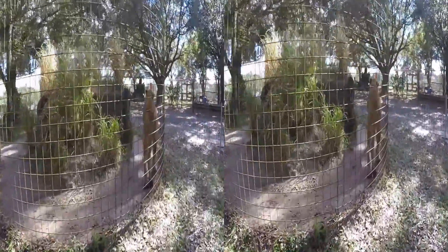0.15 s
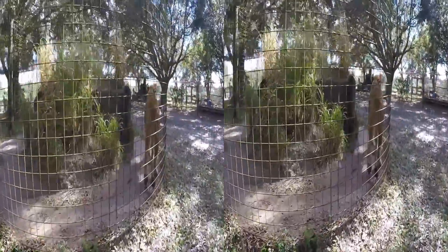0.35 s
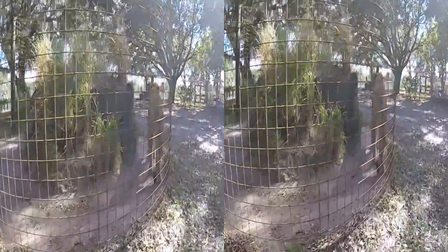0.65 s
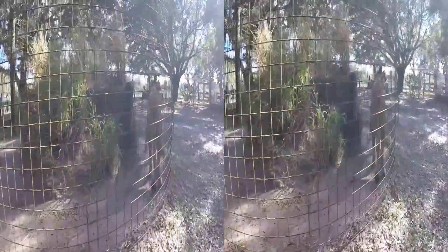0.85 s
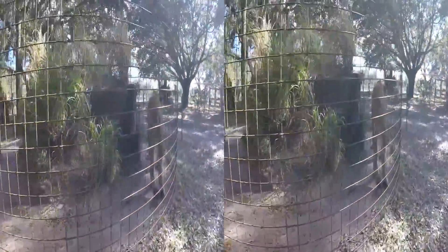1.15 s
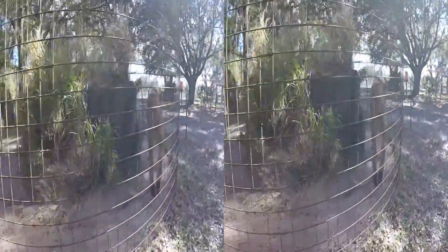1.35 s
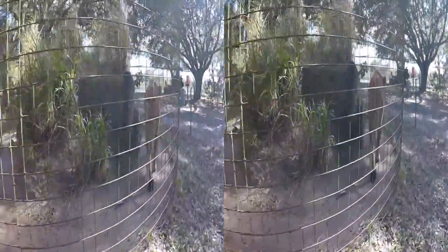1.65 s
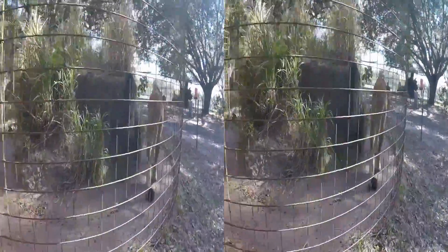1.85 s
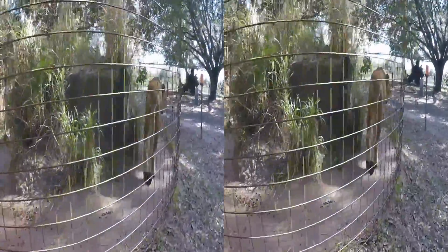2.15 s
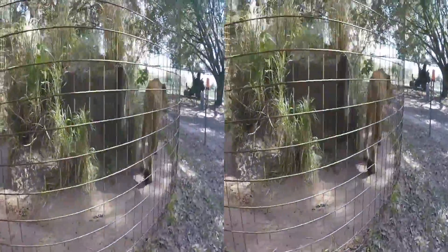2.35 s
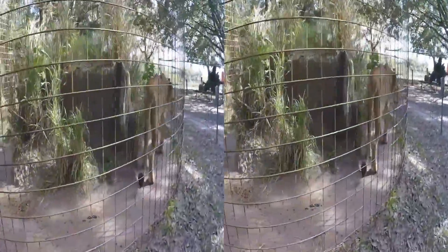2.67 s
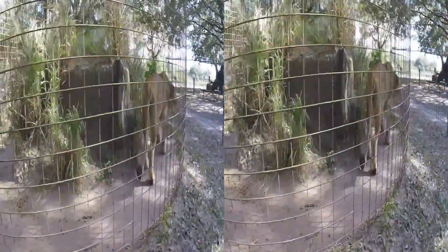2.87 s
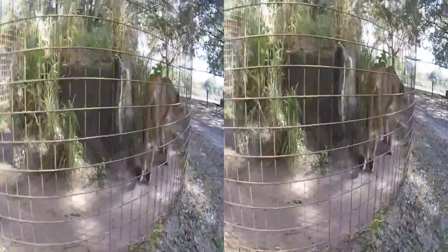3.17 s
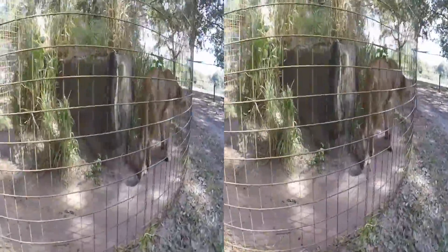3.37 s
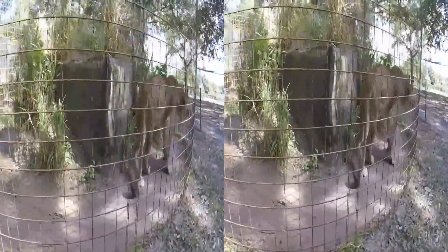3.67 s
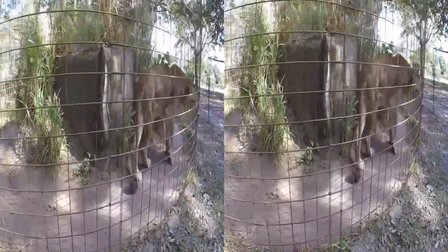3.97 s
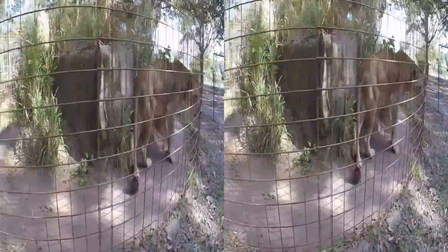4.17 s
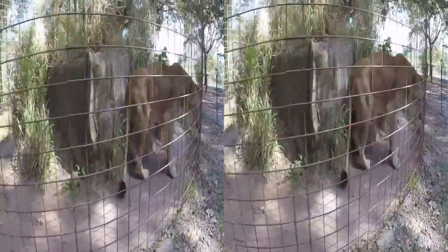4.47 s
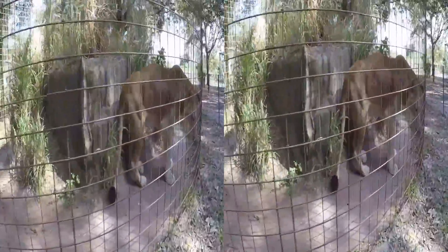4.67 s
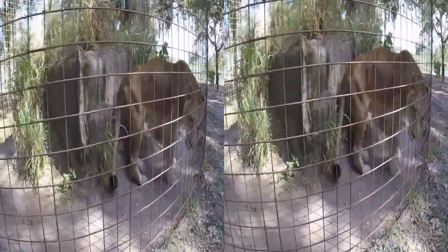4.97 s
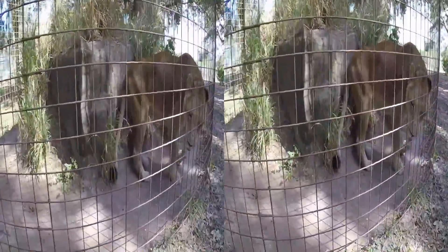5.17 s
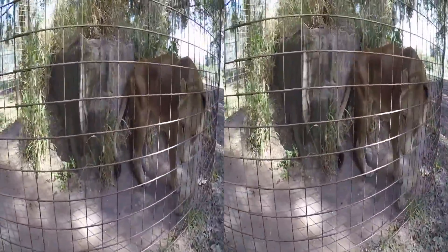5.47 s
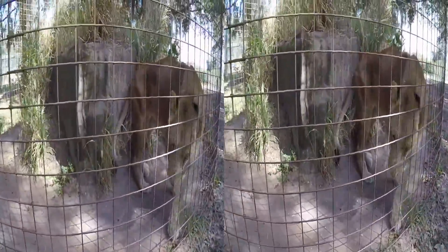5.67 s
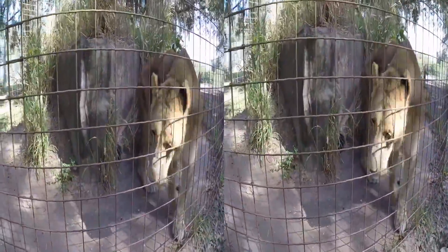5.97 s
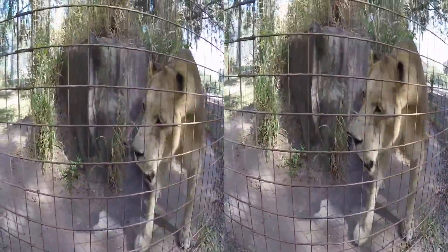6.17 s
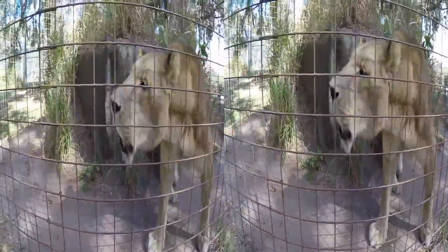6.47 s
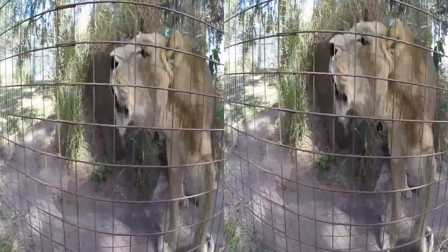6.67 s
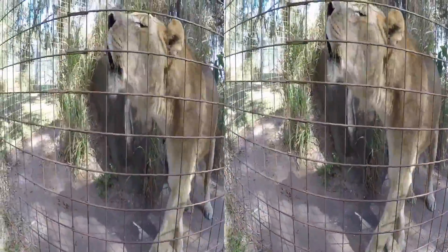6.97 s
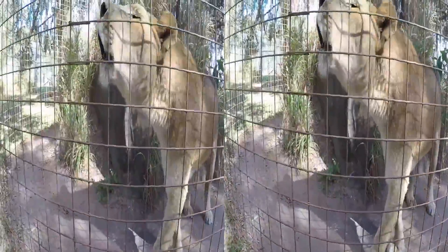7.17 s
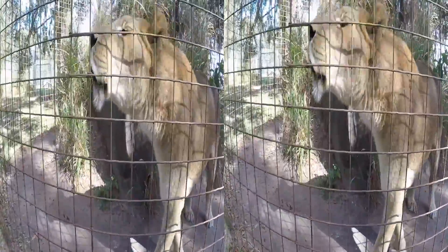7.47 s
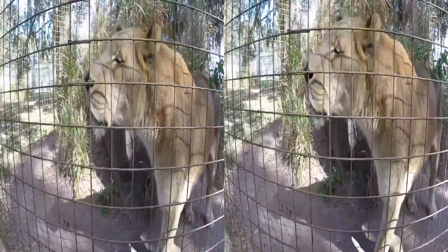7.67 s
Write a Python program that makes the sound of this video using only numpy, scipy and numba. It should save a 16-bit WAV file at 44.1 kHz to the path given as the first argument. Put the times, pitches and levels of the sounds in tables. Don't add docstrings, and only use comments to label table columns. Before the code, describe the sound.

A lion comes nearer along a fenced woodland enclosure. First a low far moan under wind buffeting, then crackling litter and small twig snaps, then a hoarse mid-distance roar with fluttering grit. The wind eases, steps rustle, and the last roar is overwhelmingly loud and close to the single microphone, rasping down into a slack growl. The background briefly drops, then creeps back with faint bird chips and a weak echo from trees.

```python
import sys
import numpy as np
from scipy import signal
from scipy.fft import rfft, irfft, next_fast_len
from scipy.io import wavfile
from scipy.ndimage import uniform_filter1d, map_coordinates
from numba import njit

SR = 44100
rng = np.random.default_rng(int(sys.argv[2]) if len(sys.argv) > 2 else 0)


def inscribe(sig):
    pcm = np.round(np.clip(np.atleast_2d(sig).T, -1, 1) * 32767)
    wavfile.write(sys.argv[1], SR, pcm.astype(np.int16))


def ratio(d):
    e = np.asarray(d, float) / 20
    return 10 ** e


N = 345300
TIME = np.arange(N) / SR


def unit(x):
    return x / np.sqrt(np.mean(x ** 2) + 1e-20)


def even(x, span_s=0.097):
    return x / np.sqrt(np.abs(uniform_filter1d(x ** 2, int(span_s * SR))) + 1e-20)


def curves(rows):
    s, *columns = np.transpose(rows)
    return [np.interp(TIME, s, column) for column in columns]


def phrases(tables, fade_s=0.012):
    gate = 0
    for table in tables:
        start, end = table[0][0], table[-1][0]
        gate = gate + np.clip(np.minimum(TIME - start + fade_s, end - TIME) / fade_s, 0, 1)
    return [np.minimum(gate, 1)] + curves(np.concatenate(tables))


def wobble(rate):
    return map_coordinates(rng.standard_normal(int(N * rate / SR) + 4), [TIME * rate])


def filtered(x, response):
    m = next_fast_len(N + 8192)
    return irfft(rfft(x, m) * response(np.fft.rfftfreq(m, 1 / SR)), m)[:N]


def noise(points):
    hz, db = np.transpose(points)
    response = lambda f: ratio(np.interp(np.log(f + 1), np.log(hz + 1), db))
    return unit(filtered(rng.standard_normal(N), response))


def modes(table):
    def response(f):
        total = 0
        for k, (hz, width, db) in enumerate(table):
            damping = 1j * f * width
            total = total + (-1) ** k * ratio(db) * damping / (hz * hz - f * f + damping)
        return total
    return response


@njit
def resonate(x, turn, r):
    y = np.zeros(len(x))
    for i in range(2, len(x)):
        y[i] = (1 - r) * (x[i] - x[i - 2]) + 2 * r * turn[i] * y[i - 1] - r * r * y[i - 2]
    return y


def tract(x, hz, width, db):
    turn = np.cos(2 * np.pi * hz / SR)
    narrow = resonate(x, turn, np.exp(-np.pi * width / SR))
    return ratio(db) * resonate(narrow, turn, np.exp(-np.pi * 5 * width / SR))


def duck():
    since = TIME - 7.42
    drop_db, recover_db_per_s = -11, 11.5
    return ratio(np.where(since > 0, np.minimum(drop_db + recover_db_per_s * since, 0), 0))


# start_s, thud_db, flap_db, half_length_s
GUSTS = [(0.01, -21, -32, 0.1), (0.37, -25, -29, 0.09), (0.619, -20.5, -18.5, 0.058),
         (0.695, -44, -22.5, 0.019), (0.818, -24, -35.5, 0.04), (0.978, -15, -28, 0.033),
         (1.135, -62, -37, 0.075), (1.336, -23, -19.5, 0.035), (1.458, -20, -23, 0.062),
         (1.596, -18, -27, 0.051), (1.949, -16.5, -23, 0.036), (2.062, -39, -23, 0.035),
         (2.166, -29, -31, 0.049), (2.344, -16, -21, 0.031), (2.425, -19.5, -20.5, 0.029),
         (2.542, -11, -21, 0.044), (2.656, -22.5, -22.5, 0.05), (2.874, -15.5, -22, 0.033),
         (3.146, -25, -33, 0.056), (3.49, -22.5, -21.5, 0.08)]
# start_s, level_db
BREEZE = [(0, -24), (1.1, -26), (1.7, -30.5), (2.0, -33), (2.28, -32), (2.42, -26.5), (2.95, -26),
          (3.3, -24), (3.9, -29), (4.25, -36), (5.3, -37), (6.2, -37.5), (7.0, -36), (7.83, -35.5)]
# pitch_hz, level_db (per Hz)
BUFFET_SPECTRUM = [(7.1, -40.5), (12, 2), (65, 4), (130, -6.5), (170, -15), (290, -120)]
FLAP_SPECTRUM = [(47, -41.5), (80, -6.5), (144, -1.5), (183, -9), (296, -21), (414, -36), (700, -47.5),
                 (910, -61.5), (1540, -120)]


def wind():
    gust = lambda s, db, half: ratio(db) * np.exp(-((TIME - s) / half) ** 4)
    thuds = sum(gust(s, db, 1.095 * half) for s, db, _, half in GUSTS)
    flaps = sum(gust(s, db, half) for s, _, db, half in GUSTS)
    low = even(ratio(11.0 * wobble(14)) * noise(BUFFET_SPECTRUM), span_s=0.083)
    sharp = even(ratio(2.0 * wobble(34.95)) * noise(FLAP_SPECTRUM), span_s=0.044)
    return (ratio(curves(BREEZE)[0]) * duck() + thuds) * low + flaps * sharp


# pitch_hz, level_db (per Hz)
PARK_SPECTRUM = [(53, -31.5), (90, 2.5), (132, -5.5), (312, -19.5), (607, -22.5), (1020, -24.5),
                 (2150, -35.5), (2450, -36), (5290, -40), (14200, -52.5), (15100, -61)]


def park():
    level_db, swell_db = -42, .8
    return duck() * ratio(level_db + swell_db * wobble(2.71)) * noise(PARK_SPECTRUM)


# start_s, peak_db, pitch_hz
CHIPS = [
    (0.049, -60, 7160),
    (0.8365, -54, 6750),
    (5.8596, -45, 6720),
    (7.649, -54, 6800),
]
# start_s, end_s, pitch_hz, level_db
FAR_BIRD = [
    (2.145, 2.165, 2870, -62),
    (2.285, 2.385, 2900, -64),
]


def bird():
    out, t = np.zeros(N + 9000), TIME[:9000]
    for s, db, hz in CHIPS:
        note = np.sin(2 * np.pi * hz * t) * np.exp(-((t - .006) / 0.0035) ** 2)
        echo = rng.standard_normal(9000) * ratio(-30.0 - 60 * t / 0.32)
        out[round(s * SR):][:9000] += ratio(db) * (note + signal.fftconvolve(note[:900], echo)[:9000])
    far = 0
    for start, end, hz, db in FAR_BIRD:
        swell = np.sqrt(np.abs(np.sin(np.pi * np.clip((TIME - start) / (end - start), 0, 1))))
        tone = np.sin(2 * np.pi * hz * TIME + .5 * wobble(40))
        far = far + ratio(db) * tone * swell * (TIME < end)
    return out[:N] + far


# start_s, effort_db, mouth_opening (0-1), airflow_db
FAR_CALL = [
    [(0, -22.5, 0.4, -59), (.09, -23, 0.34, -68), (.13, -15.5, 0.35, -61), (.246, -13, 0.28, -63),
     (.54, -14.5, 0.36, -66), (.59, -22.5, 0.41, -65.5), (.686, -31, 0.46, -73), (.74, -41, 0.36, -90)],
]
MID_CALL = [
    [(2.92, -38.5, 0.38, -99), (3.03, -32, 0.69, -82), (3.05, -26, .8, -56.5), (3.085, -43, 0.76, -61),
     (3.128, -33, 0.62, -60)],
    [(3.13, -44, 0.47, -56), (3.172, -26, 0.62, -51.5), (3.286, -23, 0.58, -55), (3.468, -16, 0.42, -52),
     (3.63, -10.5, 0.3, -47.5), (3.958, -15, 0.37, -44), (4.006, -16, 0.38, -37.5),
     (4.102, -21, 0.36, -48.5), (4.17, -45.5, 0.47, -81)],
]
NEAR_CALL = [
    [(5.97, -43.5, 0.26, -102), (6.078, -28.5, 0.49, -76), (6.192, -13, 0.94, -47),
     (6.25, -38, 0.44, -61.5)],
    [(6.365, -29, 0.96, -47), (6.403, -15, 1, -41), (6.5, -13, 0.71, -44.5), (6.56, -11, 0.62, -38.5),
     (6.985, -10.5, 0.61, -32.5), (7.01, -8.5, 0.5, -32.5), (7.07, -7, 0.44, -34), (7.33, -20.5, 0.48, -41),
     (7.41, -48, 0.17, -82)],
]


def delivery():
    gate, effort_db, opening, air_db = phrases(FAR_CALL + MID_CALL + NEAR_CALL)
    over_db = 100 * (opening - .5)
    chest_db = effort_db - 10 * np.log10(1 + ratio(2 * over_db))
    mouth_db = -4.5 + 0.54 * air_db + 0.25 * effort_db
    return gate, chest_db, chest_db + over_db, mouth_db, air_db


# breaks_s, steadies_s, slackens_s, end_s, doubling (every second beat weak, 0-1)
ROARS = [
    (-.1, .26, .4, .74, 0),
    (3.03, 3.32, 3.55, 4.17, .6),
    (6.15, 6.5, 6.98, 7.44, .55),
]


def manner():
    clear, broken, steady_rough, slack_rough = .04, .78, .45, .9
    change_s, slack_doubling = .05, .17
    growl_start, growl_end, flap_hz, flap_end_hz = .03, .9, 60, 36
    flutter_hz = 19
    rows = []
    for breaks, steady, slack, end, double in ROARS:
        full = slack + .7 * (end - slack)
        held = (steady_rough + .42 * double, double, .4 * double, flutter_hz)
        rows += [(breaks, clear, 0, 0, flutter_hz),
                 (breaks + change_s, broken, 0, 0, flutter_hz),
                 (steady - change_s, broken, double, 0, flutter_hz),
                 (steady, *held),
                 (slack, *held),
                 (slack + change_s, slack_rough, slack_doubling, growl_start, flap_hz),
                 (full, slack_rough, slack_doubling, growl_end, (flap_hz + flap_end_hz) / 2),
                 (end, slack_rough, slack_doubling, growl_end, flap_end_hz)]
    return curves(rows)


# start_s, pitch_hz
PITCH = [
    [(0, 140), (.3, 133), (.5, 128), (.74, 120)],
    [(2.92, 154), (3.03, 157), (3.06, 161), (3.2, 165)],
    [(3.32, 140), (3.53, 141), (3.67, 134.5), (3.81, 132), (3.95, 129), (4.03, 122), (4.17, 120)],
    [(5.97, 135), (6.03, 152), (6.09, 174), (6.17, 160), (6.25, 161)],
    [(6.36, 163), (6.49, 154), (6.55, 135), (6.74, 134), (6.91, 129), (6.98, 132), (7.03, 144.5),
     (7.12, 143), (7.44, 123)],
]


def folds(rough, sub, growl_hz):
    cycles = np.cumsum(curves(np.concatenate(PITCH))[0] * (1 + .02 * rough * wobble(30))) / SR
    closing = cycles + .1 * rough * wobble(70)
    swing = 2 * np.pi * np.cumsum(growl_hz * (1 + 0.1227 * wobble(15))) / SR
    beat = np.round(closing).astype(int)
    size = (1 - sub * (beat % 2)) * ratio(3.5 * rough * rng.standard_normal(N)[beat])
    closeness = np.cos(2 * np.pi * closing) - 1
    pulses = even(size * np.exp(150 * closeness))
    puffs = (1.6 + size * np.exp(2.1 * closeness)) * ratio(.6 * wobble(35) + 1.6 * wobble(110))
    return cycles, swing, pulses, even(puffs)


SHAPES = {"hum": ((306, 473, 752, 1050, 1270, 1580), (5, 9.5, -3, -10, -1)),
          "oh": ((333, 532, 824, 1063, 1364, 1770), (7.5, 5.5, -4.5, -4.5, 0.5)),
          "moan": ((296, 446, 652, 1176, 1370, 1730), (7.5, 3, 4.5, -0.5, 4)),
          "gape": ((508, 275, 722, 1120, 1350, 1830), (-4, 8.5, 4, -1, 0)),
          "lean": ((442, 276, 760, 1200, 1580, 1770), (8.5, -7, 0.5, 0, 0.5)),
          "high": ((382, 528, 887, 1270, 1500, 1740), (-16, -8, 3, 5, 0.5)),
          "mid": ((339, 490, 898, 1223, 1447, 1650), (-8, -2.5, -1, -2.5, 0.5)),
          "shut": ((307, 438, 1014, 1244, 1400, 1670), (-3.5, 5, -6, -8.5, 0.9)),
          "wide": ((482, 270, 1028, 1210, 1450, 1809), (-21.5, -12, 0.5, -3, 1.1)),
          "tall": ((422, 610, 900, 1213, 1450, 1620), (-14, -5.5, -9, 5, 6.5)),
          "full": ((407, 550, 800, 1130, 1434, 1580), (-13.5, -5.5, -5, -7, 0.7)),
          "deep": ((337, 540, 747, 1030, 1367, 1800), (-14.5, -2, 6, -11, 1.9)),
          "low": ((338, 541, 760, 936, 1243, 1754), (-10.5, -4, 5.5, -2, 0.7)),
          "slack": ((374, 513, 760, 955, 1170, 1530), (-2.5, -2.5, 0.5, -2, 2.2))}
# start_s, shape reached
GESTURE = [(.21, "hum"), (.24, "oh"), (0.6, "oh"), (0.741, "low"), (3.04, "moan"), (3.17, "gape"),
           (3.29, "lean"), (3.349, "high"), (3.53, "mid"), (3.7, "mid"), (3.81, "shut"), (4.17, "shut"),
           (5.97, "moan"), (6.25, "moan"), (6.36, "wide"), (6.491, "wide"), (6.541, "tall"), (6.78, "full"),
           (6.87, "deep"), (6.95, "low"), (7.0, "low"), (7.06, "slack"), (7.44, "low")]


def throat_shape(rough):
    rows = [(s, *SHAPES[name][0], *SHAPES[name][1]) for s, name in GESTURE]
    *centres, second_db, third_db, fifth_db, sixth_db, stretch = curves(rows)
    centres = [hz * (1 + .02 * rough * wobble(11)) for hz in centres]
    return centres, second_db, third_db, fifth_db, sixth_db, np.clip(stretch, .97, 1.03)


# width_hz, level_db
WIDTHS = [(37.2, 9), (51.6, 4), (45, -5.5), (66, 2), (79, -0.5)]


def throat(x, centres):
    bands = [tract(x, hz, width, db) for hz, (width, db) in zip(centres, WIDTHS)]
    return bands + [tract(x, centres[5], 98, -6)]


# pitch_hz, width_hz, level_db
HEAD = [(2025, 67, -1.5), (2375, 260, 2), (3080, 330, 1), (3625, 240, -1), (4130, 380, -3), (4970, 450, -6),
        (5500, 400, -5), (6650, 1400, -8.5), (8300, 1750, -9), (10200, 2000, -27.5), (13800, 2900, -24)]
# start_s, tilt_db (per octave)
BRIGHT = [(0, -10), (.45, -10), (.52, -4.5), (3.0, -23), (3.24, -25), (3.3, -1), (3.6, -2), (3.9, -2.5),
          (4.2, -2), (6.0, -30), (6.43, -26.5), (6.55, -1), (6.95, -2), (7.1, -5), (7.3, -0.5), (7.44, -6)]


def head(x, stretch):
    tilt_db, = curves(BRIGHT)
    out = 0
    for k, (hz, width, db) in enumerate(HEAD):
        centre = hz * (1 + .03 * wobble(3.5)) * stretch ** (min(1, 4500 / hz) ** 2)
        level_db = db - 10 * np.log10(width) + 1.7 * wobble(9) * (hz < 9000)
        level_db = level_db + tilt_db * np.clip(np.log2(hz / 3700), 0, 1)
        out = out + (-1) ** (k + (hz > 9000)) * tract(x, centre, width, level_db)
    return out


# start_s, share (0-1)
SINUS_OPEN = [
    (6.2, 0),
    (6.3, 1),
    (6.86, 1),
    (6.92, 0),
]


def sinus(x):
    return x - curves(SINUS_OPEN)[0] * filtered(x, modes([(2790, 230, 0)]))


# start_s, throat_db, head_db
CROAKS = [(0.141, -33.5, -46.5), (0.418, -25.5, -42), (0.517, -20, -26), (0.669, -22, -29),
          (3.147, -39, -29), (3.458, -16.5, -31), (3.54, -38, -30), (3.805, -14.5, -14),
          (3.843, -10.5, -13), (3.88, -28, -15), (3.915, -17, -23), (3.986, -12, -15.5),
          (4.007, -16.5, -14.5), (4.028, -18, -20), (4.046, -14.5, -15), (4.092, -19, -22),
          (4.121, -23, -22.5), (6.56, -24.5, -10), (6.669, -17.5, -17), (6.72, -15.5, -21),
          (6.74, -19, -7.5), (6.799, -19.5, -13.5), (6.844, -18.5, -13), (6.898, -6, -11),
          (6.957, -18, -12.5), (7.195, -3.5, -21.5), (7.202, -21, -6), (7.218, -17, -9),
          (7.235, -26, -13.5), (7.257, -24, -11.5), (7.29, -8.5, -4), (7.318, -8.5, -9), (7.343, -30, -16),
          (7.366, -27, -25), (7.396, -20.5, -22)]


def croaks(centres, stretch):
    slaps = np.zeros((2, N))
    for s, *db in CROAKS:
        slaps[:, round(s * SR)] = ratio(db)
    bursts = ratio(-60 * TIME[:2000] / np.array([[0.025], [0.03]]))
    air = signal.fftconvolve(slaps, bursts, axes=1)[:, :N] * rng.standard_normal(N)
    slap, spit = air + 9 * slaps
    levels_db = [10.4, 2.3, 7.1, 7.0, 7.7, 2.3]
    croak = sum(ratio(db) * x for db, x in zip(levels_db, throat(slap, centres)))
    hiss = ratio(7) * head(spit, stretch) + tract(spit, 2700 * (1 + 0.073 * wobble(14)), 600, -7)
    return croak + sinus(hiss)


# start_s, end_s, from_hz, to_hz, level_db
CAVITIES = [(0.25, 0.455, 3000, 3000, -65.5), (.6, .64, 1960, 1930, -54), (.08, 0.257, 202, 194, -36),
            (.5, .7, 2950, 2970, -65), (3.085, 3.175, 3400, 3440, -60), (3.19, 3.41, 3360, 3070, -64),
            (3.19, 3.31, 2480, 2520, -63.5), (3.31, 3.5, 3000, 2900, -63.5), (3.39, 3.56, 2380, 2300, -65),
            (3.27, 3.39, 6150, 5800, -63), (3.396, 3.5, 6550, 6450, -64), (3.621, 3.797, 2900, 2960, -54),
            (3.33, 3.498, 4700, 5050, -65), (3.55, 3.76, 4300, 4230, -59), (3.548, 3.858, 5200, 5660, -62),
            (3.802, 4.106, 702, 666, -40.5), (3.85, 4.12, 3720, 3520, -51.5), (3.96, 4.1, 2500, 2355, -47),
            (6.364, 6.54, 710, 613, -23.5), (6.358, 6.494, 808, 760, -37.5),
            (7.0, 7.347, 1530, 1450, -53.5), (6.506, 6.66, 5610, 5780, -50),
            (6.58, 6.867, 8460, 8200, -59.5), (6.6, 6.852, 7750, 8040, -60.5),
            (6.602, 6.756, 4860, 4890, -47.5), (6.686, 6.955, 6860, 6640, -57),
            (6.79, 6.998, 4110, 3960, -42), (6.88, 7.058, 5100, 5100, -45.5),
            (7.002, 7.172, 2650, 3180, -40.5), (7.087, 7.198, 4650, 4550, -47),
            (7.36, 7.395, 920, 1030, -47)]


def cavities(air):
    out = np.zeros(N)
    for start, end, from_hz, to_hz, db in CAVITIES:
        a, b = round(start * SR), round(end * SR)
        u = np.arange(b - a) / (b - a)
        sung = tract(air[a:b], from_hz + (to_hz - from_hz) * u, .03 * from_hz, 0)
        out[a:b] += ratio(db) * unit(sung) * np.sqrt(2 * np.sin(np.pi * u))
    return out


def lion():
    gate, chest_db, low_db, mouth_db, breath_db = delivery()
    rough, sub, growl, growl_hz = manner()
    cycles, swing, pulses, puffs = folds(rough, sub, growl_hz)
    flap = np.cos(swing)
    throb = ratio(3.0 * growl * (flap + 6.5))
    air = lambda: throb * puffs * rng.standard_normal(N)
    mixed = lambda share: np.sqrt(1 - share) * throb * pulses + np.sqrt(share) * .8 * air()
    source = mixed(rough)
    hoarse = mixed(rough ** .3)

    centres, second_db, third_db, fifth_db, sixth_db, stretch = throat_shape(rough)
    bands, upper = throat(source, centres), throat(hoarse, centres)
    windpipe = (sub + 0.079 * growl) * tract(source, 208 * centres[0] / 390, 82.0, 9.6)
    second = ratio(second_db) * (bands[1] + sub * upper[1])
    low = even(bands[0] - second + ratio(third_db + 4.5) * upper[2] - windpipe)
    mouth = ratio(third_db) * upper[2] - upper[3] + ratio(fifth_db) * upper[4] - ratio(sixth_db) * upper[5]
    mouth = even(mouth)
    breath = even(sinus(head(air(), stretch)))

    shimmer = ratio(1.2 * rough * wobble(45))
    tone = np.sqrt(2) * np.cos(2 * np.pi * cycles - 0.4 * growl ** 4.0 * np.sin(swing)) * shimmer
    tone = tone * (1 + 1.07 * growl ** 2.35 * flap - 0.5 * sub * np.cos(np.pi * cycles))
    between = sub * shimmer * ratio(2.0 * wobble(14)) * np.cos(3 * np.pi * cycles)
    voice = ratio(chest_db) * tone - ratio(low_db - 6.5) * between
    voice = voice + ratio(0.41 * chest_db - 9.5) * growl ** 4 * flap
    voice = voice + ratio(low_db) * low + ratio(mouth_db) * mouth + ratio(breath_db) * breath
    return gate * voice + croaks(centres, stretch) + cavities(air()) + knocks()


def trees(x):
    t = TIME[:SR // 3]
    tail = rng.standard_normal(len(t)) * ratio(-60 * t / 0.24)
    return signal.fftconvolve(np.pad(x, (300, 0)), tail / np.linalg.norm(tail))[:N]


# centre_s, crunch_db, crisp_db, half_length_s
RUSTLE = [(0.53, -49.5, -14.5, 0.12), (0.747, -53.5, -13.5, 0.022), (1.153, -55.5, -15, 0.098),
          (1.31, -62.5, -11.5, 0.063), (1.728, -50.5, -7, 0.011), (5.58, -57, -13, 0.048),
          (1.848, -60, -17, 0.21), (2.317, -62.5, -15.5, 0.19), (2.512, -54, -15, 0.075),
          (4.207, -50, -19, 0.076), (4.416, -57, -10.5, 0.044), (4.652, -56.5, -12, 0.026),
          (4.92, -52.5, -16, 0.088), (5.529, -59, -18.5, 0.034), (5.663, -58.5, -5.5, 0.025),
          (5.704, -64, 1, 0.016), (5.873, -60, -3, 0.078), (7.69, -67, -19, 0.02),
          (7.661, -62.5, -12.5, .006)]
# start_s, peak_db, pitch_hz, spit_db
SNAPS = [(0.751, -39, 3000, -23), (0.992, -52, 1800, -22), (1.0314, -34, 3720, -23.5),
         (1.9874, -32.5, 3800, -17), (2.0172, -18.5, 5900, -28.5), (2.0413, -27, 4200, -32),
         (2.1422, -34, 1860, -25), (2.186, -30, 4130, -28), (2.2129, -27.5, 3470, -33),
         (2.268, -33.5, 2700, -16.5), (2.268, -37.5, 4500, -23), (2.0185, -29, 2700, -30),
         (2.389, -33, 5800, -24.5), (2.4945, -30, 4300, -25), (2.562, -36, 5000, -25),
         (1.798, -34, 4000, -25), (1.319, -47, 1500, -18), (1.73, -32, 3500, -18), (2.388, -38, 2640, -11),
         (2.4951, -32.5, 2220, -26), (2.5623, -30.5, 2520, -21), (4.1729, -30, 4830, -26),
         (4.2006, -35, 2260, -23), (4.3458, -40, 1950, -25), (4.4297, -34, 1840, -26),
         (5.0652, -38, 2090, -23), (5.5024, -38, 1830, -12.5), (5.6466, -46, 1810, -20),
         (1.345, -21.5, 480, -31), (1.79, -25.5, 745, -32.5), (2.426, -25.5, 1030, -25),
         (4.777, -28.5, 1270, -19), (5.542, -18, 800, -27), (5.5412, -28, 1350, -20)]


def leaves():
    grains = rng.standard_normal(N) * (1 + (rng.random(N) < .02) * ratio(3 * rng.exponential(size=N)))
    grains = grains * ratio(3.35 * wobble(60))
    crunch = unit(filtered(grains, modes([(1360, 1100, 15.3), (4300, 4900, 3.8)])))
    crisp = unit(filtered(grains, lambda f: modes([(10500, 6000, 0)])(f) ** 2))
    steps = 0
    for s, db, crisp_db, half in RUSTLE:
        press = ratio(db) * np.exp(-((TIME - s) / half) ** 2)
        steps = steps + press * (crunch + ratio(crisp_db) * crisp)
    out, t = np.pad(steps, (0, 900)), TIME[:900]
    for s, db, hz, spit_db in SNAPS:
        thin = hz > 1700
        attack = 1 - np.exp(-t * hz * (1.5 if thin else 20))
        snap = np.sin(2 * np.pi * hz * t) * np.exp(-t * hz / 0.96) * attack
        later = rng.uniform([.9, .3, 1.3], [1.1, .8, 2]) * .0024 * SR
        again = 0
        for lag, weaker_db in zip(later.astype(int), [0, -4, -6]):
            again = again + ratio(-3.5 + weaker_db) * np.roll(snap, lag)
        spit = ratio(spit_db - 11.0 - 60 * t / .006) * np.diff(rng.standard_normal(901))
        crack = snap + thin * (ratio(3.5) * again + snap) + spit
        out[round(s * SR):][:900] += ratio(db - 1.0) * crack
    return out[:N]


# start_s, pitch_hz, level_db
WHISTLE = [
    [(3.06, 699, -36.5), (3.09, 690, -25), (3.14, 699, -23), (3.19, 715, -31.5)],
    [(6.14, 934, -45.5), (6.2, 834, -37.5), (6.25, 788, -34), (6.29, 745, -30.5), (6.32, 702, -13),
     (6.35, 674, -12.5), (6.38, 690, -15.5), (6.41, 675, -25), (6.46, 640, -31.5)],
]


def whistle():
    gate, hz, db = phrases(WHISTLE)
    unsteady = 0.005 + 0.029 * np.clip((TIME - 6.38) / 0.036, 0, 1)
    turn = 2 * np.pi * np.cumsum(hz * (1 + unsteady * wobble(60))) / SR
    overtones = 0
    for k, level_db in enumerate([-23, -38, -42.5, -40, -43, -62.0, -62.0, -53.0]):
        overtones = overtones + ratio(level_db) * ratio(3 * wobble(25) - 0.5) * np.sin((k + 2) * turn)
    overtone_db = -.22 * (db + 24) - 16 * (TIME < ROARS[2][0] - 1)
    return gate * ratio(db + 3) * (np.sin(turn) + ratio(overtone_db) * overtones)


# start_s, pitch_hz, peak_db, t60_s
KNOCKS = [
    (7.194, 426, -4, 0.075),
    (7.311, 429, -6, 0.073),
    (7.343, 350, -23.5, 0.16),
    (7.397, 374, -18.5, .09),
]


def knocks():
    out = 0
    for s, hz, db, t60 in KNOCKS:
        t = np.clip(TIME - s, 0, None)
        out = out + ratio(db - 60 * t / t60) * (1 - np.exp(-t / 0.0026)) * np.sin(2 * np.pi * hz * t)
    return out


def scene():
    cat = lion() + whistle()
    answer = ratio(-17) * trees(cat)
    return (wind() + park() + bird() + cat + answer + leaves())[None]


def low_pass(x):
    return signal.sosfilt(signal.butter(12, 15290, fs=SR, output="sos"), x)


def record(dry):
    held = dry / (1 + np.abs(dry / .96) ** 6) ** (1 / 6)
    return low_pass(held)


dry = scene()
out = record(dry)
inscribe(out)
```